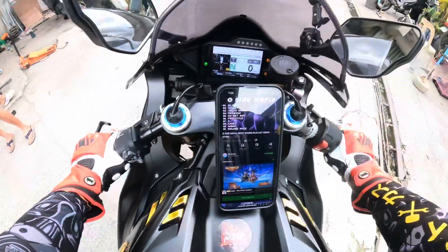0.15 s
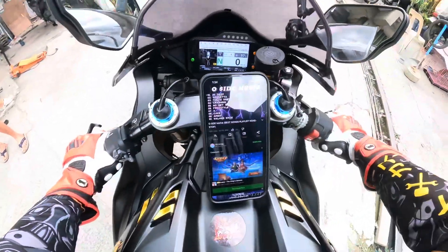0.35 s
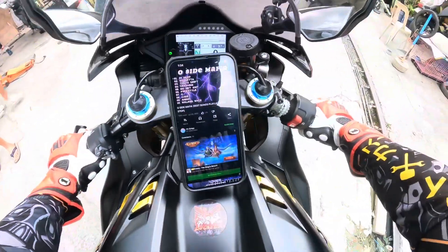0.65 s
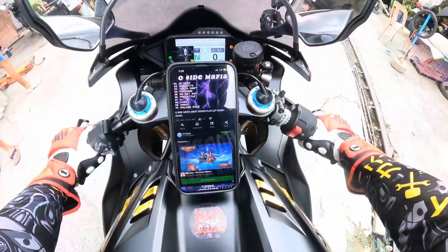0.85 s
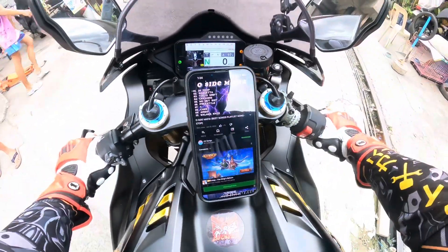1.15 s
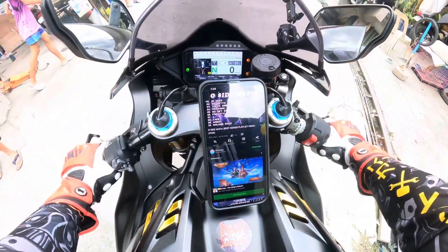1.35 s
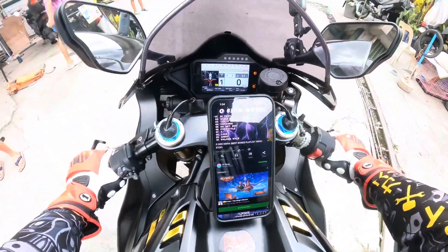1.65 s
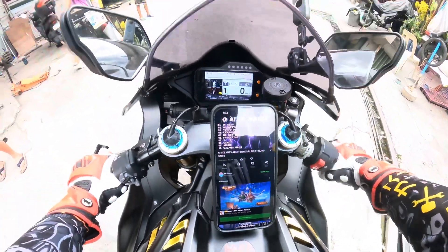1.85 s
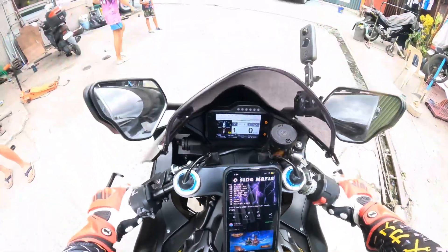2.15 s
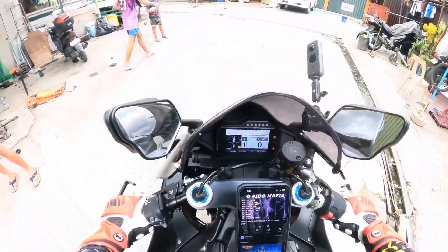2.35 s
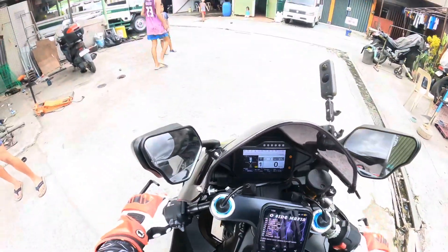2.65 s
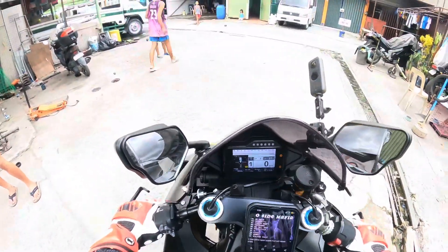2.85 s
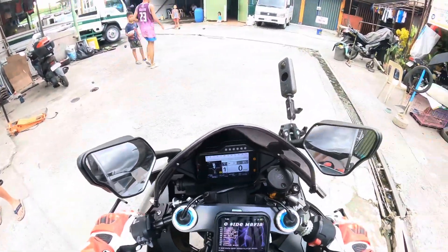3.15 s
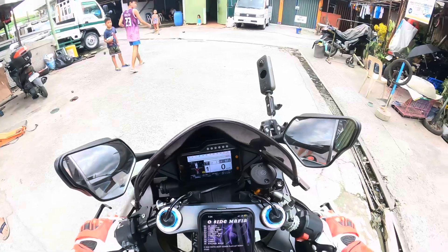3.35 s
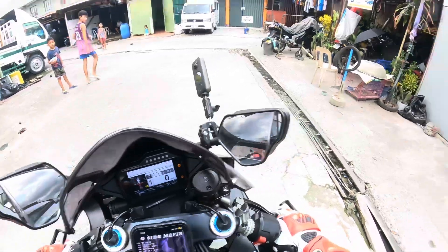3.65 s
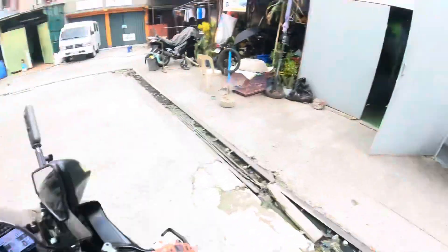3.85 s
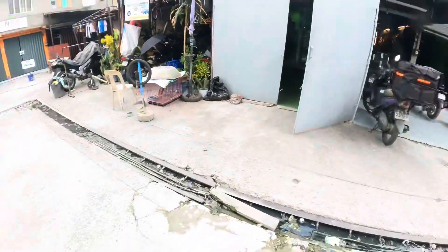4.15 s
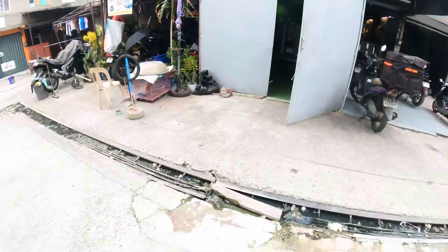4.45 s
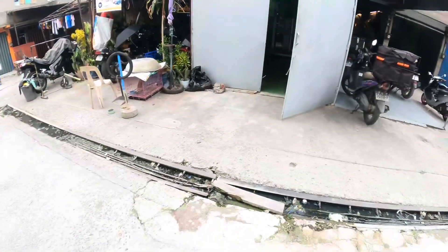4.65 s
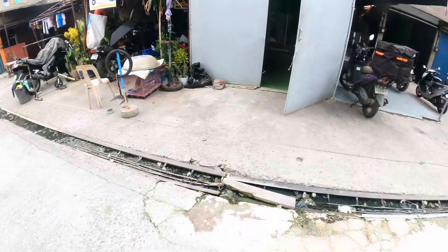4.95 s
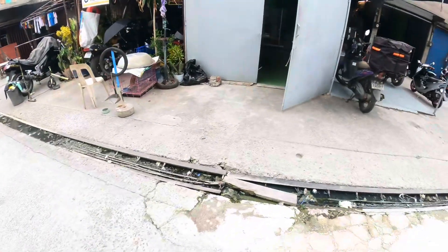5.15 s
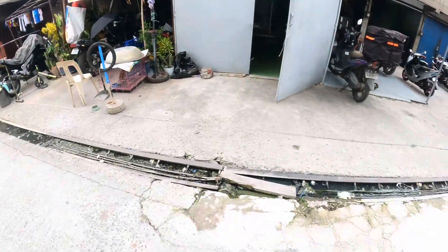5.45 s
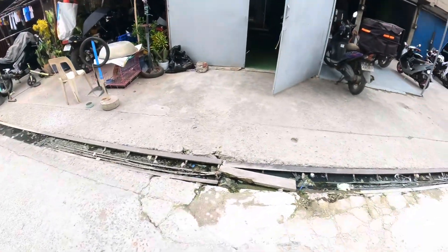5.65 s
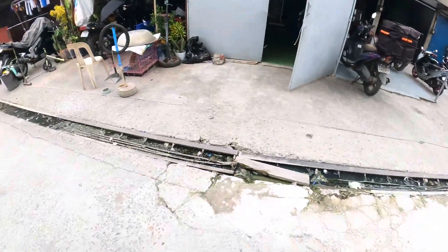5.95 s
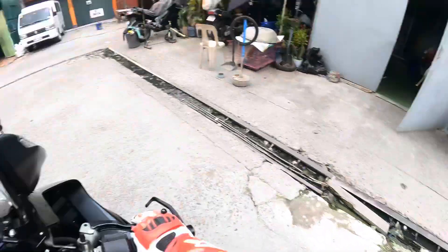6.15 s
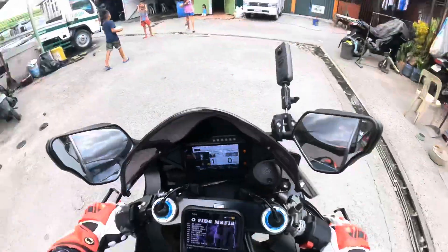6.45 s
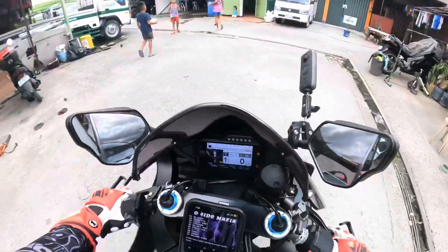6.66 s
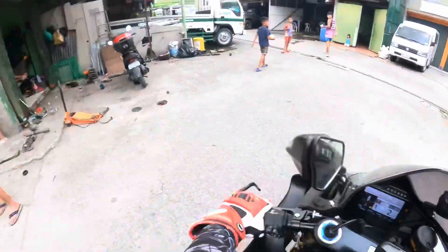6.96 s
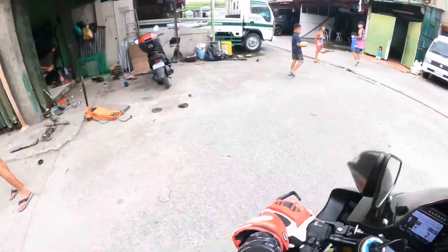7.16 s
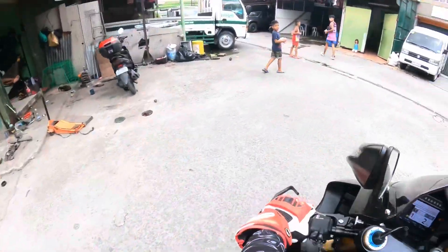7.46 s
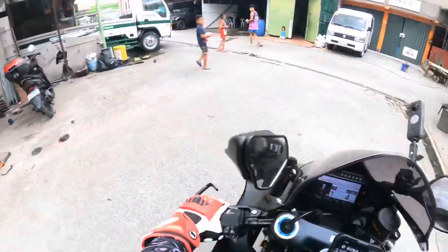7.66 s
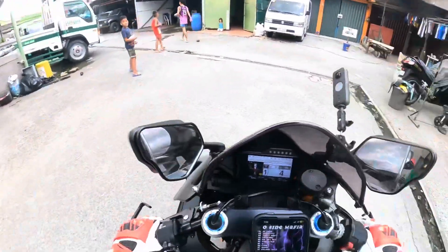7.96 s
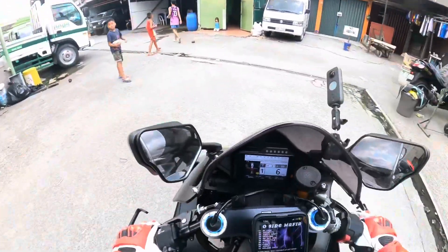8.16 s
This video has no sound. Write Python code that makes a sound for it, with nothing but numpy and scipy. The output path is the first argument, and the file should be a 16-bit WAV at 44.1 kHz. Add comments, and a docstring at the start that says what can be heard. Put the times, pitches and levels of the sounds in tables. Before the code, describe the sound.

A four-cylinder motorcycle idles, blips, clunks into gear, stumbles, then gives one sharp, crackling rev and settles into steady running.

```python
"""Four-cylinder motorcycle at idle

Heard from the rider's seat: a small blip, a gear knocked in, a faster idle, a stumble, one sharp rev
that dies away, and steady running again. The firings form a pulse train: each one thumps, excites the
resonances of the exhaust pipe and puffs gas. Valves and gears clatter in the casing."""
import sys
import numpy as np
from scipy import signal
from scipy.io import wavfile
from scipy.ndimage import uniform_filter1d

SR = 44100
rng = np.random.default_rng(int(sys.argv[2]) if len(sys.argv) > 2 else 0)


def dump_mix(stems):
    """Bounce the given channels to the path in sys.argv[1] as a 16-bit WAV at rate SR."""
    frames = np.atleast_2d(stems).T  # one column per channel
    limited = np.clip(frames, -1, 1)  # hard clip at full scale
    pcm = np.round(limited * 32767).astype(np.int16)
    wavfile.write(sys.argv[1], SR, pcm)


N = 366471
T = np.arange(N) / SR


def gain_of(db):
    """Amplitude ratio of a level in decibels."""
    return 10 ** (np.asarray(db) / 20)


def follow(rows):
    """Linear interpolation of a table's columns over time."""
    s, *columns = np.transpose(rows)
    return [np.interp(T, s, c) for c in columns]


def by_speed(hz, rows):
    """Interpolation of a table's columns over log firing rate."""
    at, *columns = np.transpose(rows)
    return [np.interp(np.log(hz), np.log(at), c) for c in columns]


def slope(hz, hz_per_s):
    """Squared acceleration: 0 to 1 as the revs change at up to this signed rate."""
    return uniform_filter1d(np.clip(np.gradient(hz) * SR / hz_per_s, 0, 1) ** 2, size=1500)


def evened(x, seconds=.1):
    """Normalisation to a running rms of 1."""
    size = round(seconds * SR)
    return x / np.sqrt(abs(uniform_filter1d(uniform_filter1d(x ** 2, size), size)) + 1e-20)


def lowpass(x, hz):
    """A steep low-pass gives a pulse a finite rise time."""
    return signal.sosfilt(signal.butter(4, hz, fs=SR, output="sos"), x)


def drift(hz):
    """Slow random modulation of rms 1."""
    return evened(lowpass(rng.standard_normal(N), hz), 4.6)


def decay(x, seconds):
    """A leaky integrator gives each pulse an exponential tail."""
    return signal.lfilter([1], [1, -np.exp(-1 / (seconds * SR))], x)


def colour(x, points):
    """Minimum-phase filter with the gain of a (Hz, dB) table."""
    f, db = np.transpose(points)
    log_hz = np.log(abs(np.fft.fftfreq(4096, 1 / SR)) + 1)
    log_gain = np.interp(log_hz, np.log(f), db) * np.log(10) / 20
    taps = np.fft.ifft(np.exp(np.conj(signal.hilbert(log_gain)))).real
    return signal.oaconvolve(x, taps[:2048])[:len(x)]


def resonate(x, hz, width):
    """Heterodyne resonance of gain 1: shift hz down to zero, smooth, shift back."""
    turn = np.exp(2j * np.pi * np.cumsum(hz * np.ones(len(x))) / SR)
    r = np.exp(-np.pi * width / SR)
    return 2 * (turn * signal.lfilter([1 - r], [1, -r], x / turn)).real


def ring(x, modes, flutter_db=0, flutter_hz=4):
    """Superposition of double-pole modes of alternating sign, each free to swell on its own."""
    out = 0
    for k, (hz, width, db) in enumerate(modes):
        r = np.exp(-np.pi * width / SR)
        pole = r * np.exp(2j * np.pi * hz / SR)
        swell = gain_of(flutter_db * drift(flutter_hz)) if np.any(flutter_db) else 1
        mode = signal.lfilter([(1 - r) ** 2], [1, -2 * pole, pole ** 2], x).real
        out = out + (-1) ** k * gain_of(db) * swell * mode
    return out


# Distant rumble: a spectrum, then its level in dB. Each row: frequency in Hz, relative gain in dB.
RUMBLE = [(15, -41), (30, 15), (60, 6), (200, 9.5), (1000, -47.5), (3000, -94)], -29

def street():
    """Low-frequency noise forms a steady ambient floor."""
    spectrum, level_db = RUMBLE
    return gain_of(level_db) * evened(colour(rng.standard_normal(N), spectrum), .42)


# Casing noise. Each row: time in seconds, clatter level in dB, treble fizz level in dB.
CLATTER_LEVELS = [(0.0, -39, -67), (0.16, -37.5, -64), (0.32, -46, -71), (0.71, -47.5, -88.5),
                  (1.1, -43, -78.5), (1.3, -41, -63.5), (1.5, -41, -73), (1.62, -39, -66), (1.78, -38, -62),
                  (2.05, -38.5, -69), (2.43, -37.5, -72), (2.6, -37.5, -69), (2.68, -42, -71),
                  (4.0, -44.5, -78.5), (4.3, -49, -97), (4.6, -45.5, -72), (4.88, -58.5, -78),
                  (5.16, -43.5, -79), (5.3, -37, -62), (5.6, -41.5, -71), (6.13, -53, -92),
                  (6.97, -44.5, -86), (7.5, -48, -87.5), (8.31, -42, -77)]
# Spectra of clatter and fizz. Each row: frequency in Hz, relative gain in dB.
CASING_SPECTRUM = [(900, -20), (2000, 1), (2600, -2.5), (3300, -12.5), (4300, -17), (5000, -23),
                   (6500, -25), (8000, -33.5), (11000, -57.5), (16000, -72.5)]
FIZZ_SPECTRUM = [(3000, -39.5), (6500, -2), (8000, -9.5), (11000, -6.5), (16000, -28)]
# Casing resonances. Each row: frequency in Hz, width in Hz, relative gain in dB.
CASING_MODES = [(1640, 370, 6.5), (1070, 300, 9), (2323, 34, 4.5), (3506, 130, -11.5), (4510, 86, -13.5),
                (5240, 150, -22.5)]
# Gear whines. Each row: time in seconds, low and high whine in dB re the clatter, high pitch in Hz.
GEAR_WHINES = [(0, -30, -21, 5940), (1.7, -20, -25.5, 5990), (2.2, -15.5, -34, 5840), (2.7, -15, -20, 6320),
               (3.5, -12.5, -23, 6050), (4.1, -14, -18, 5700), (4.4, -32, -21.5, 5880),
               (6.2, -31.5, -27, 5910), (6.6, -9.5, -19, 5700), (7.2, -14.5, -21, 5920),
               (7.5, -24, -20.5, 5850), (7.9, -13.5, -21.5, 6000), (8.31, -18, -28, 5900)]

def clatter(turns, strength):
    """Impact excitation: dense taps, stronger after each firing, drive casing modes and gear whines."""
    taps = rng.standard_normal(N) * gain_of(1.5 * rng.exponential(1, N))
    taps *= 1 + .5 * strength * np.exp(-(turns % 1) / .96)
    level_db, fizz_db = follow(CLATTER_LEVELS)
    low_db, high_db, high_hz = follow(GEAR_WHINES)
    modes = evened(ring(taps, CASING_MODES, flutter_db=1.5, flutter_hz=2.2), .54)
    casing = evened(colour(taps, CASING_SPECTRUM)) + gain_of(2.5) * modes
    for db, hz, width in (low_db, 3680, 70), (high_db, high_hz, 210):
        whine = evened(resonate(resonate(taps, hz, width), hz, width), .6)
        casing += gain_of(db + 1.5 * drift(6)) * whine
    fizz = evened(colour(taps, FIZZ_SPECTRUM), .3)
    return gain_of(level_db) * casing + gain_of(fizz_db + 1.8 * drift(12)) * fizz


# Gear dogs engaging. Each row: start in seconds, peak in dB, tilt in dB per octave, T60 in seconds,
# level of the high ring in dB.
GEAR_KNOCKS = [(1.572, -7, -6, 0.044, -23.5), (1.605, -5, -7.5, 0.052, -44)]
# Gearbox resonances. Each row: frequency in Hz, width in Hz, relative gain in dB.
GEARBOX_MODES = [(670, 780, 0), (970, 900, 2), (1156, 160, 12), (1610, 370, -4), (2650, 1560, -6),
                 (4170, 760, -7), (5700, 1400, -7.5), (8300, 2600, -16), (11000, 3300, -27)]
# Single ticks. Each row: start in seconds, level in dB, frequency in Hz.
METAL_TICKS = [(2.0694, -39, 7840), (6.2194, -39, 6200), (6.4643, -30.5, 5600)]

def knocks():
    """Metal impacts excite the gearbox modes and loose parts rattle on; ticks are damped sinusoids."""
    out, t = np.zeros(N), np.arange(9000) / SR

    def ping(db, hz, t60, rise_s):
        return gain_of(db - 60 * t / t60) * np.sin(2 * np.pi * hz * t) * np.minimum(t / rise_s, 1)

    for s, peak_db, tilt, t60, dog_db in GEAR_KNOCKS:
        noise = rng.standard_normal(len(t))
        jangle = gain_of(-20.5 + 4 * rng.standard_normal(len(t)) - 60 * t / .98)
        modes = [(hz, width, db + tilt * np.log2(hz / 1000)) for hz, width, db in GEARBOX_MODES]
        blow = ring(noise * (gain_of(-60 * t / t60) + jangle), modes)
        dog_ring = ping(dog_db, hz=5800, t60=.025, rise_s=.0016)
        out[round(s * SR):][:len(t)] += gain_of(peak_db) * blow / abs(blow).max() + dog_ring
    for s, db, hz in METAL_TICKS:
        out[round(s * SR):][:len(t)] += ping(db, hz, t60=.0047, rise_s=.0006)
    return out


# Lumps of air. Each row: start in seconds, length in seconds, signed peak (negative is suction).
AIR_LUMPS = [(5.09, 0.051, -.2), (5.135, 0.017, -0.44), (5.21, 0.055, -0.15), (5.29, 0.071, 0.26),
             (5.49, 0.042, 0.23)]

def air_lumps():
    """Air pushed past the microphones makes slow, single pressure pulses."""
    return sum(peak * np.sin(np.pi * np.clip((T - s) / length, 0, 1)) ** 2
               for s, length, peak in AIR_LUMPS)


# Bursts of crackle during the rev. Each row: start in seconds, length in seconds, level in dB.
CRACKLE_BURSTS = [(4.824, .03, -61), (4.87, 0.056, -46), (5.102, 0.11, -36.5), (5.154, 0.074, -26),
                  (5.357, 0.091, -32.5)]
# Single sharp clicks. Each row: start in seconds, peak in dB.
SHARP_CLICKS = [(4.827, -29), (4.841, -22), (4.892, -26), (4.897, -28), (5.107, -23), (5.369, -13),
                (5.412, -20), (5.422, -20), (5.462, -21), (5.474, -22), (5.516, -21), (5.596, -27),
                (5.61, -25)]
# Spectrum of crackle and clicks. Each row: frequency in Hz, relative gain in dB.
CRACKLE_SPECTRUM = [(900, -1.5), (2000, -4.5), (3000, -7), (4500, -16.5), (7000, -27.5), (11000, -34.5),
                    (16000, -45.5)]

def overload_crackle(pulses):
    """Overload distortion: crackle and sharp clicks as the loud rev overloads the microphone."""
    envelope = 0
    for s, length, db in CRACKLE_BURSTS:
        fall_db = 9.4 * np.maximum(T - s - length, 0) / length  # short bursts die faster
        envelope += gain_of(db - fall_db) * np.clip((T - s) / .0036, 0, 1)
    spikes = pulses * gain_of(4 * rng.standard_normal(N))
    hiss = decay(spikes, seconds=.003) * rng.standard_normal(N)
    out = envelope * evened(colour(spikes + .06 * hiss, CRACKLE_SPECTRUM), .04)
    t = np.arange(400) / SR
    for s, peak_db in SHARP_CLICKS:
        tail = .15 * rng.standard_normal(len(t)) * np.exp(-t / .001)
        click = colour((t == 0) + tail, CRACKLE_SPECTRUM)
        out[round(s * SR):][:len(t)] += gain_of(peak_db) * click / abs(click).max()
    return out


def stumble(load_db, hz):
    """Combustion instability: 0 to 1 as both load and firing rate sink."""
    return np.clip((-14.5 - load_db) / 3, 0, 1) * np.clip((125 - hz) / 30, 0, 1)


# Engine speed. Each row: time in seconds, firing rate in Hz.
FIRING_RATE = [(0, 47.6), (.21, 47.5), (.35, 109), (.38, 107), (.58, 78.4), (.71, 59.8), (.9, 43.7),
               (1.16, 49), (1.4, 47.8), (2.55, 47), (2.75, 70), (3.17, 69.5), (3.24, 72.6), (3.47, 70.1),
               (3.89, 69.2), (3.98, 66.9), (4.23, 63), (4.4, 42.5), (4.6, 55), (4.65, 70), (4.69, 96),
               (4.74, 84), (4.77, 93.7), (4.92, 205), (5.07, 172.3), (5.116, 204), (5.204, 314),
               (5.252, 383), (5.296, 405), (5.334, 407), (5.384, 381), (5.572, 295.5), (5.76, 220),
               (6, 146.3), (6.126, 115.4), (6.28, 72), (6.38, 80.4), (6.5, 69.4), (6.78, 67.2),
               (6.94, 68.9), (7.34, 70.2), (7.52, 66.7), (7.64, 69.2), (7.75, 67.2), (8.31, 66.6)]
# How hard the cylinders fire. Each row: time in seconds, load in dB, extra pipe drone in dB.
ENGINE_LOAD = [(0.0, -4.5, 1), (0.04, -12, 6), (0.11, -10.5, 1), (0.18, -13, 3), (0.28, -5.5, 4.5),
               (0.32, -7, 3), (0.37, -19.5, 1), (0.42, -20, -3), (0.48, -19, 1), (0.54, -15.5, 0.5),
               (0.61, -18, -3), (0.66, -15.5, 1.5), (0.74, -15.5, -2.5), (0.83, -21.5, 2.5),
               (0.88, -15, -6.5), (1.09, -13, 3.5), (2.52, -10, 1), (2.68, -9, 7.5), (2.75, -10, 5),
               (3.77, -10, 3), (4.21, -12.5, 7.5), (4.3, -20, -18), (4.35, -12, 2.5), (4.37, -19, 4),
               (4.44, -10.5, -4), (4.47, -17.5, 3), (4.67, -2.5, 0.5), (4.72, -12.5, 6), (4.77, -9, 3.5),
               (4.91, -14.5, 0.5), (4.98, -22.5, -2), (5.05, -22, -2), (5.11, -5.5, -4.5), (5.23, -7, -7),
               (5.33, -15.5, -10), (5.41, -12, -8), (5.5, -10.5, -22), (5.56, -8, -13), (5.7, -9, -13.5),
               (5.76, -9, -21), (5.83, -16.5, -3), (5.88, -16.5, -1), (5.96, -16.5, -0.5), (6.04, -18.5, 4),
               (6.2, -16.5, -7.5), (6.3, -18.5, -0.5), (6.34, -9.5, -1), (6.37, -8.5, 0.5),
               (6.43, -14.5, -2), (6.53, -12.5, 1.8), (6.71, -13, -2), (6.99, -11, 7), (8.31, -11, 4)]
# Brief load steps, mostly drop-outs. Each row: start in seconds, length in seconds, change in dB.
DROPOUTS = [(4.591, 0.013, -9), (4.693, 0.047, -7.5), (4.915, 0.03, -1.5), (6.302, 0.014, 1.5),
            (6.336, 0.018, -3)]

def engine_state():
    """Modulation of rate and load: the speed hunts and staggers; firings hit harder after a drop-out."""
    hz, = follow(FIRING_RATE)
    load_db, sing_db = follow(ENGINE_LOAD)
    hunt = .004 * drift(5)
    stagger = .05 * stumble(load_db, hz) * np.clip(2 - hz / 60, 0, 1) * drift(14)
    steps_db = 0
    for s, length, db in DROPOUTS:
        refire_db = 3.5 * (T >= s + length) * np.exp(-abs(T - s - length) / .0079)
        steps_db += db * ((T > s) & (T < s + length)) + refire_db
    load_db += uniform_filter1d(uniform_filter1d(steps_db, size=60), size=60)
    return hz * (1 + hunt + stagger), load_db, sing_db


# The four cylinders. Each row: strength in dB and lateness in firing periods (both at an imbalance
# of 1), coupling to the pipe in dB.
CYLINDER_TRAITS = [(1.6, .03, 3.5), (-1, 0, -3), (.5, -.02, .5), (-1.1, -.01, -2)]
# Unevenness. Each row: firing rate in Hz, imbalance factor, exponent of thump swing, scatter in dB.
UNEVENNESS = [(44, 1.1, 1.5, 1.9), (48, 1.1, 1.5, 1.4), (68, .35, .5, .6), (90, .7, .9, .9),
              (200, .5, .7, .6), (400, .4, .5, 1.2)]
# Ragged burning as the throttle opens and shuts. Each row: time in seconds, share from 0 to 1.
RAGGED_BURN = [(4.72, 0), (4.91, .15), (4.93, .85), (5.06, .85), (5.1, .05), (5.34, .05), (5.37, .6),
               (5.41, 0)]
OVERRUN_HZ_PER_S = -340

def firings(hz, load_db):
    """Cycle-to-cycle variation: returns phase in firings, an uneven pulse train and its strength."""
    turns = np.cumsum(hz) / SR
    k = np.arange(1, 1200)
    chance = rng.standard_normal((len(k), 2))
    cylinder_db, late, _ = np.transpose(CYLINDER_TRAITS)[:, k % 4]
    overrun = slope(hz, OVERRUN_HZ_PER_S)
    imbalance, _, scatter_db = by_speed(hz, UNEVENNESS)
    scatter_db = np.interp(k, turns, scatter_db + 4.5 * stumble(load_db, hz) + 4 * follow(RAGGED_BURN)[0])
    imbalance = np.interp(k, turns, imbalance + .9 * overrun)
    pair_db = np.interp(k, turns, 2.5 * overrun * np.clip(hz / 100 - 1, 0, 1)) * (-1) ** k
    strength = gain_of(pair_db + imbalance * cylinder_db + scatter_db * chance[:, 0])
    strength *= k < turns[-1] - 1
    at = np.interp(k + imbalance * late + .013 * scatter_db * chance[:, 1], turns, np.arange(N))
    whole = np.clip(at.astype(int), 0, N - 2)
    pulses = np.zeros(N)
    np.add.at(pulses, whole, strength * (1 - at + whole))  # split over two samples for exact timing
    np.add.at(pulses, whole + 1, strength * (at - whole))
    return turns, pulses, np.interp(turns, k, strength + 1e-3)


# Spectra of escaping gas and of bare pulses. Each row: frequency in Hz, relative gain in dB.
GAS_SPECTRUM = [(250, -30.5), (500, 10.5), (620, 1.5), (780, -3), (1000, -2), (1300, -8.5), (1700, -18),
                (2500, -37.5), (3500, -35), (6000, -80.5)]
SNARL_SPECTRUM = [(250, -30), (450, 13.5), (620, 5.5), (780, 13), (980, -1), (1200, 1), (1600, -10.5),
                  (2200, -24.5), (3000, -36), (4000, -35), (7000, -63)]

def gas_rasp(hz, pulses, gas, ragged):
    """Flow noise at the outlet, joined at speed by pulses that pass the silencer intact."""
    bare = (hz / 120) ** 2 * (1 - .8 * ragged) * gain_of(2 * drift(8))
    rasp = evened(evened(colour(gas, GAS_SPECTRUM)) - bare * evened(colour(pulses, SNARL_SPECTRUM)))
    # near top speed the second harmonic of the rasp is halved
    return rasp - .5 * np.clip(hz / 100 - 3, 0, 1) * resonate(rasp, 2 * hz, width=60)


# Exhaust and header pipe resonances. Each row: frequency in Hz, width in Hz, relative gain in dB.
PIPE_MODES = [(343.2, 45.3, 5), (403.4, 49, -1.5), (480.6, 100, -14), (523, 26, -14.5), (752.2, 30, -16)]
HEADER_MODES = [(777, 190, -2), (996, 120, -1.5)]

def pipe_drone(turns, pulses, drive):
    """Air-column resonance: all cylinders ring the pipe, and one also rings its header."""
    cylinder = np.round(turns).astype(int) % 4
    header = evened(ring(pulses * (cylinder == 0), HEADER_MODES), .54)
    coupling = gain_of(uniform_filter1d(np.transpose(CYLINDER_TRAITS)[2][cylinder], size=40))
    pipe = evened(ring(coupling * drive, PIPE_MODES, flutter_db=1.7, flutter_hz=3.02), .25)
    return pipe + gain_of(-25.5) * np.roll(header, round(.005 * SR))  # lands on the drone's peak


# Silencer and chamber resonances. Each row: frequency in Hz, width in Hz, relative gain in dB.
SILENCER_MODES = [(70.2, 15, 11), (94.5, 24, 2), (138.6, 20, -1)]
CHAMBER_MODES = [(207, 85.6, 0.47), (237, 79.4, 0.93), (270.7, 52, 1)]

def silencer_boom(hz, drive):
    """Cavity resonance: the silencer rings just after the chamber ahead of it, each mode wavering."""
    burble_db = 1 + .4 * by_speed(hz, UNEVENNESS)[2]
    silencer = ring(np.roll(drive, round(.0015 * SR)), SILENCER_MODES, burble_db, flutter_hz=10)
    chamber = ring(drive, CHAMBER_MODES, burble_db, flutter_hz=10)
    return evened(silencer - chamber, .14)


# Strong-weak firing on the overrun. Each row: multiple of the firing rate, level in dB re the thump.
HALF_ORDERS = [(.5, -20), (1.5, -4)]

def firing_thump(hz, turns, strength, ragged):
    """The fundamental of the firings, with half orders when they alternate as the revs fall."""
    swing = strength ** by_speed(hz, UNEVENNESS)[1]
    thump = evened(swing * np.cos(2 * np.pi * (turns + .27)), .25)
    paired = sum(gain_of(db) * np.cos(2 * np.pi * order * turns) for order, db in HALF_ORDERS)
    thump += slope(hz, OVERRUN_HZ_PER_S) * np.clip(hz / 150 - 1, 0, 1) * paired
    return thump * (1 - .8 * ragged ** 2)


# Exhaust balance. Each row: firing rate in Hz, then relative thump, boom, drone and rasp in dB.
EXHAUST_MIX = [(44, -12.5, -1, -11.5, -21), (48.5, -4, -3.5, -13, -18.5), (68.5, -2, -4, -11.5, -20.5),
               (86, -9, -4.5, -9.5, -19), (117, -6, 1, -3, -12), (182, -2, -2, -1, -5.5),
               (278, -5.5, -13.5, -6, -9.5), (410, 2.5, -2.5, -14, -6)]
# The exhaust's midrange. Each row: time in seconds, extra rasp in dB.
RASP_BOOST = [(0, 3), (.4, 2.5), (.9, 3), (1.5, 4), (2.2, 0.5), (2.8, 0), (3.15, -2), (3.27, 5.5),
              (3.45, -2.5), (3.9, 2.5), (4.1, 4), (4.35, 3), (4.6, 3), (4.85, 5), (5.0, 2), (5.17, 2),
              (5.3, 7), (5.36, 11), (5.45, 2), (5.7, -3.5), (6, 2.5), (6.35, -1), (6.7, -2), (7.5, -2.5),
              (8.31, 0.4)]

def exhaust(hz, load_db, sing_db, turns, pulses, strength):
    """Source and filter: pulses and puffs of gas drive the resonances, over the thump of the firings."""
    thump_db, boom_db, drone_db, rasp_db = by_speed(hz, EXHAUST_MIX)
    ragged, = follow(RAGGED_BURN)
    puffs = 1 + .5 * lowpass(decay(pulses, seconds=.0008), 700)
    gas = evened(puffs * rng.standard_normal(N))
    drive = -lowpass(evened(pulses) + (.07 + 1.6 * ragged ** 2) * gas, 2000)
    drone = pipe_drone(turns, pulses, drive)
    overtones = gain_of(boom_db) * silencer_boom(hz, drive)
    overtones += gain_of(drone_db + sing_db + .9 * drift(8.3)) * drone
    overtones -= resonate(overtones, hz, width=25)  # the thump carries the first order
    # fast firings leave the lowest mode at rest
    overtones -= np.clip(hz / 80 - 1, 0, 1) * resonate(overtones, 65, width=80)
    rising = slope(hz, hz_per_s=330)  # climbing revs thin the thump and lift the rasp
    thump_db -= 5.5 * rising * np.clip(hz / 75 - 1, 0, 1)
    rasp_db += .5 * rising + follow(RASP_BOOST)[0]
    thump = gain_of(thump_db) * firing_thump(hz, turns, strength, ragged)
    rasp = gain_of(rasp_db) * gas_rasp(hz, pulses, gas, ragged)
    return gain_of(load_db) * (thump + overtones + rasp)


# Likeness of left and right. Each row: frequency in Hz, coherence from 0 to 1.
COHERENCE = [(60, 1), (2000, 1), (5000, 1), (9000, 0.45), (16000, 0.35)]

def scene():
    """One near source reaches both sides alike; scattering decorrelates its treble."""
    hz, load_db, sing_db = engine_state()
    turns, pulses, strength = firings(hz, load_db)
    mid = exhaust(hz, load_db, sing_db, turns, pulses, strength) + clatter(turns, strength)
    mid += overload_crackle(pulses) + air_lumps() + knocks() + street()
    f, _, spectrum = signal.stft(mid, SR, nperseg=256)
    coherence = np.clip(np.interp(f, *np.transpose(COHERENCE)), 0, 1)[:, None]
    random_phase = np.exp(2j * np.pi * rng.random(spectrum.shape[::-1]).T)
    scattered = abs(spectrum) * random_phase * np.sqrt((1 - coherence) / (1 + coherence))
    side = signal.istft(scattered, SR, nperseg=256)[1][:N]
    return np.array([mid + side, mid - side]) * gain_of([[.75], [-.75]])


def record(dry):
    """Soft saturation rounds the peaks, between an infrasonic cut and a band limit."""
    cut = signal.sosfilt(signal.butter(2, 6, "high", fs=SR, output="sos"), dry)
    soft = 1.2 * np.tanh(cut / 1.2)
    band_limit = signal.firwin(511, 15800, window=("kaiser", 9), fs=SR)
    return signal.oaconvolve(soft, band_limit[None], "same")


dry = scene()
out = record(dry)
dump_mix(out)
```